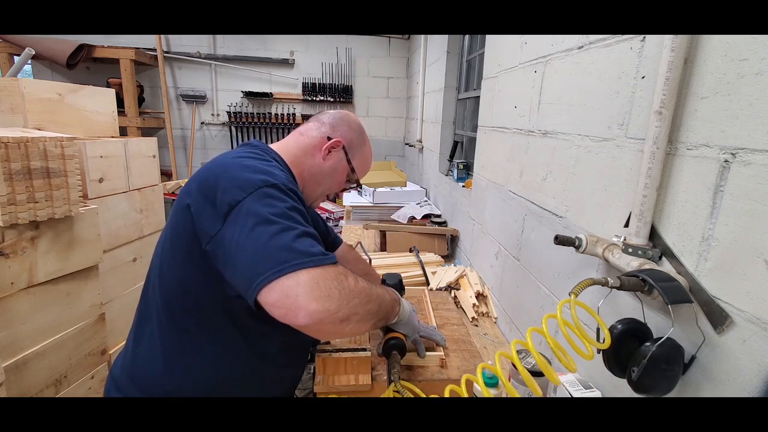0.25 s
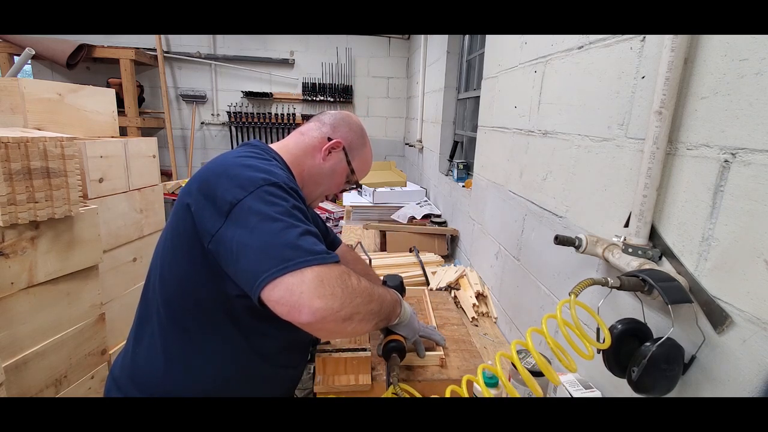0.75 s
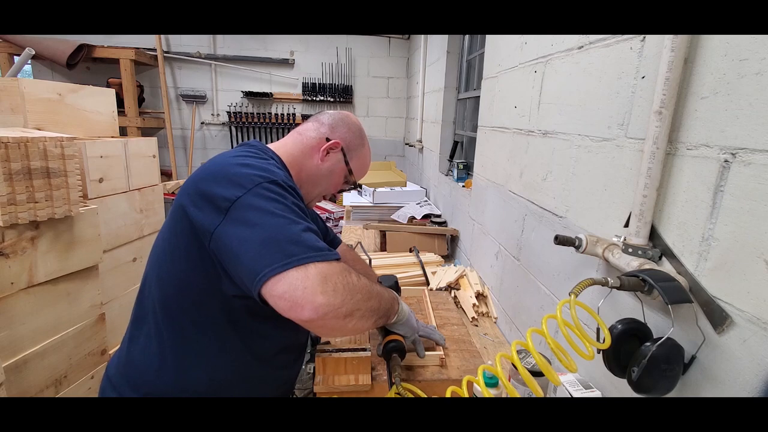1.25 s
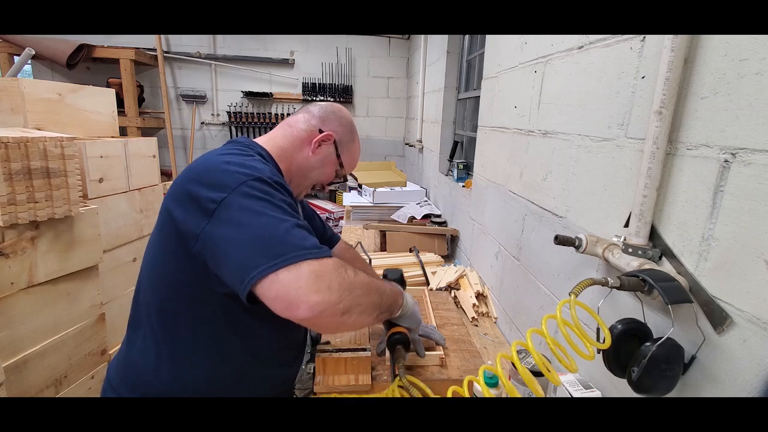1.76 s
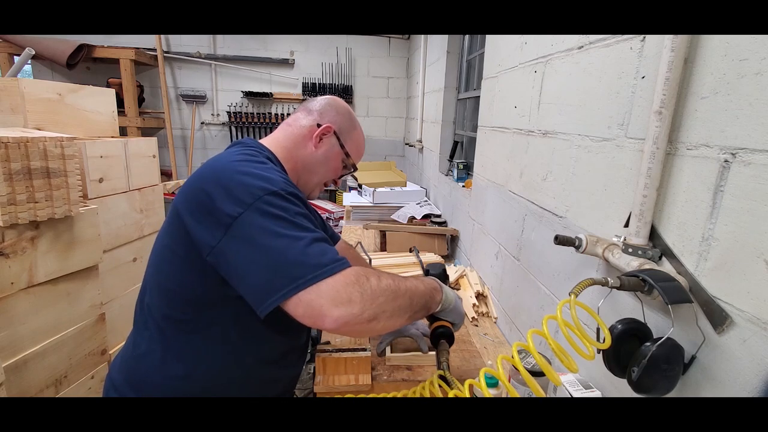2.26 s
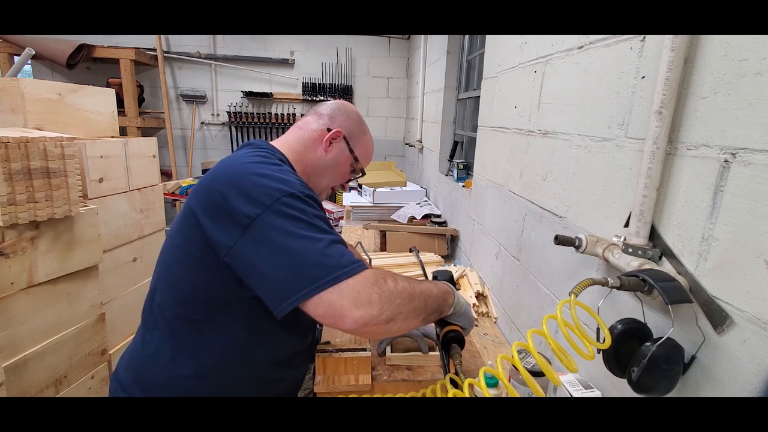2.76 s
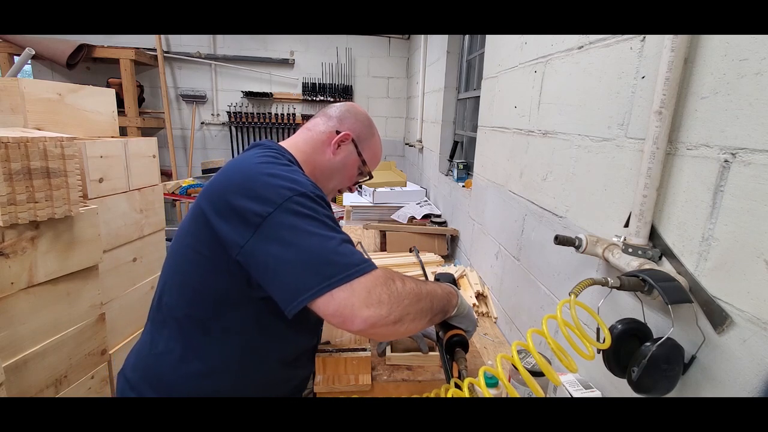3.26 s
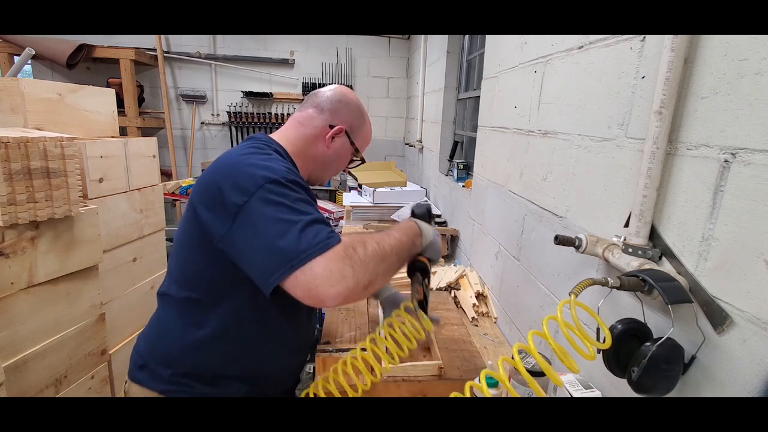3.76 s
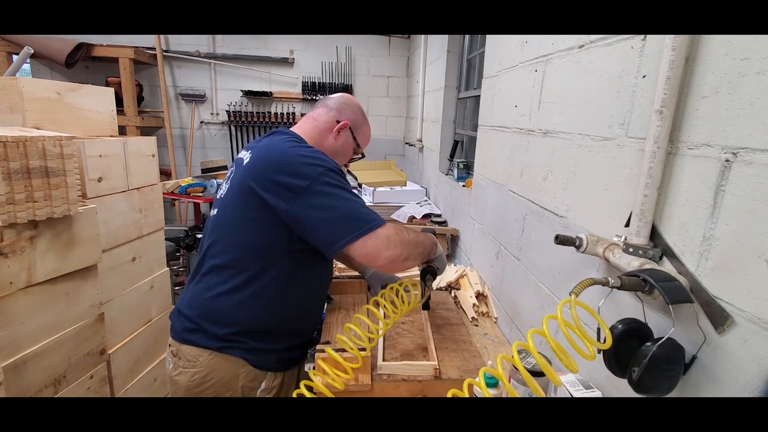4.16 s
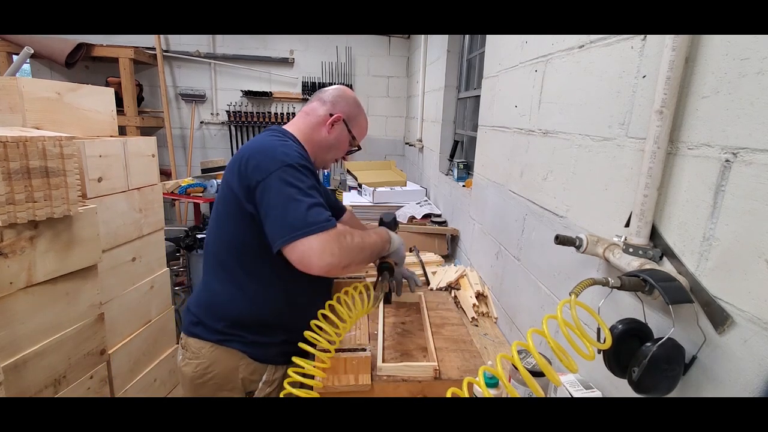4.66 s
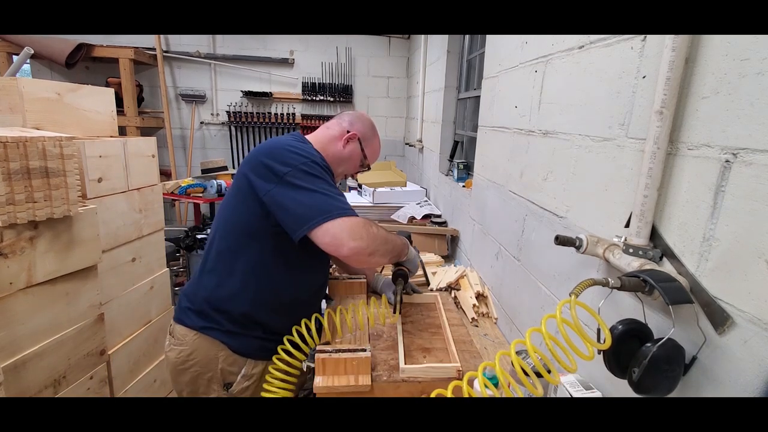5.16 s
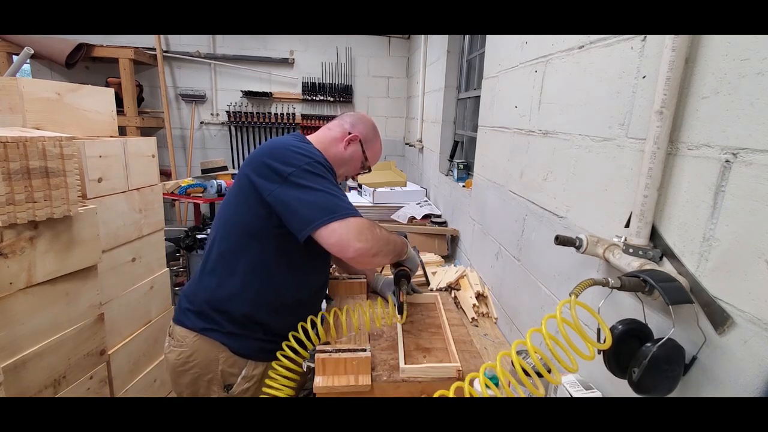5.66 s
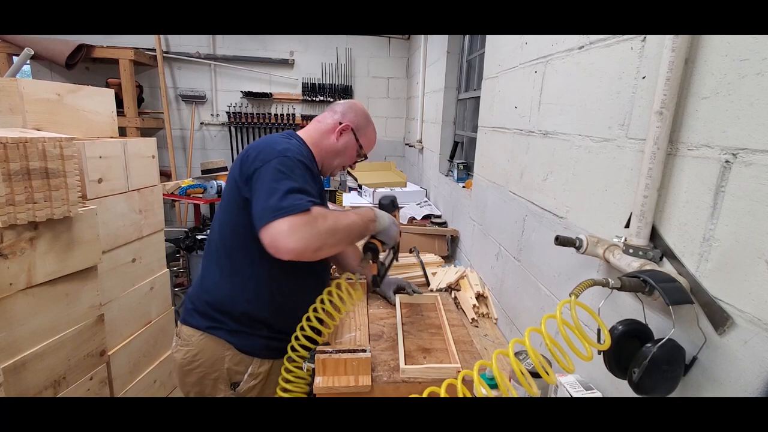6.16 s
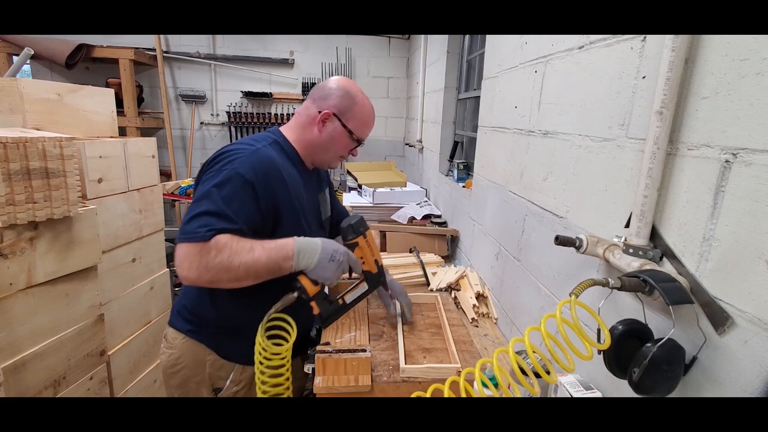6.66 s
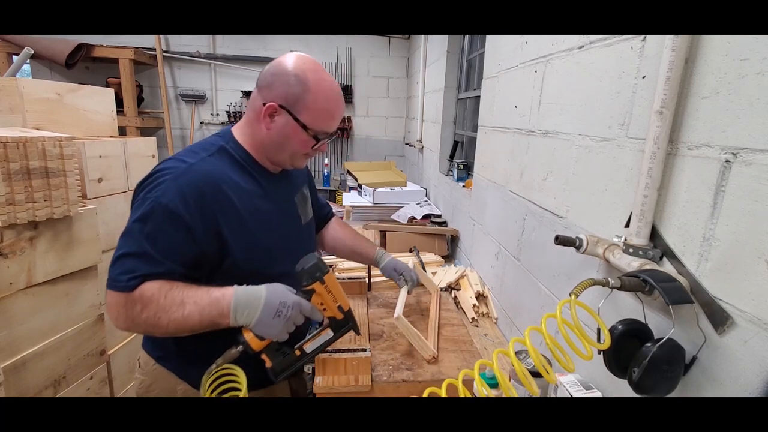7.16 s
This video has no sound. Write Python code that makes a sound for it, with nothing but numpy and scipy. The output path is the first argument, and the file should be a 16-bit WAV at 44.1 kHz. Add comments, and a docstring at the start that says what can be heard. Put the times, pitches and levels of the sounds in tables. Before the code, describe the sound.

An air-fed stapler fires four hard, cracking shots into wooden frames, each followed by a venting puff, with wooden knocks and bench rumble between.

```python
"""Hands rumble and rustle at a bench in a block-walled workshop, a hose seeps, and tool and frame knock.
Then an air-fed stapler fires four staples into wooden frames: each shot is a valve pop and the driver's blow.
Letting go of the trigger pops the valve again, vents the cylinder and springs the piston back.
Between shots come more knocks; about the third shot a frame drags and a grip squeaks, later the nose clinks.
Sines make the pops, squeaks and struck modes, coloured noise the rest; a limiter flattens the loud moments."""
import sys
import numpy as np
from scipy import signal
from scipy.fft import rfft, irfft, next_fast_len
from scipy.io import wavfile
from scipy.ndimage import uniform_filter1d, map_coordinates

SR = 44100
rng = np.random.default_rng(int(sys.argv[2]) if len(sys.argv) > 2 else 0)


def amplitude_ratio(level_db):
    """Convert a level in decibels to the matching linear amplitude (field) ratio."""
    exponent = np.asarray(level_db, float) / 20
    return 10 ** exponent


def generate_wav(sig):
    """Save sig (samples, or channels by samples) to the path in sys.argv[1] as 16-bit PCM at SR."""
    pcm = np.round(np.clip(np.atleast_2d(sig).T, -1, 1) * 32767).astype(np.int16)
    wavfile.write(sys.argv[1], SR, pcm)


N = 327486  # length in samples

# Levels in the tables are relative: each layer trims them further in the mix.
# block walls: (frequency [Hz], decay time t60 before the extra late loss [s], level [dB])
WALLS = [(60, 0.97, -4), (250, 0.51, -5.5), (990, 0.4, -3.5), (4100, 0.64, -0.5), (12300, 0.37, -5)]
# colour difference of the two ports: (frequency [Hz], left over right [dB])
PORT_BALANCE = [(60, -2.5), (500, -6), (4000, -5.5), (8000, -4.5), (13000, -4)]
# air seeping from the bent hose joint: (start [s], end [s], level [dB])
HOSE_LEAKS = [(-.1, 1.6, -65), (4.9, 5.85, -64.5), (7.03, 7.5, -63.5)]
# colour of the seeping air: (frequency [Hz], density [dB])
SEEP_COLOUR = [(760, -32.5), (1300, -1.5), (3280, -10.5), (6450, -11.5), (9580, -16.5), (11300, -1),
               (15600, -8)]
# hands shifting things on the bench top: (start [s], end [s], rumble level [dB])
HAND_SPELLS = [(0, .12, -37), (.33, .87, -50), (1.0, 1.2, -53), (1.36, 1.6, -42.5), (2.6, 2.9, -62),
               (3.02, 3.3, -43.5), (3.55, 4.3, -33.5), (4.87, 5.3, -39.5), (5.4, 6.1, -34.5),
               (6.73, 6.82, -57), (6.9, 7.5, -37.5)]
# colour of the shaken bench: (frequency [Hz], density [dB])
RUMBLE_COLOUR = [(15, -52.5), (25, -15.5), (97, -3.5), (134, -17.5), (186, -9.5), (470, -32.5), (1400, -46),
                 (1950, -73.5), (3300, -120)]
# strokes of cloth on wood: (start [s], strongest [s], end [s], level [dB])
CLOTH_STROKES = [(0, 0.01, 0.12, -61), (2.906, 3.003, 3.25, -73), (4.4, 4.482, 5.1, -60),
                 (6.7, 6.785, 6.92, -57), (6.9, 7.07, 7.8, -55)]
# colour of cloth on wood: (frequency [Hz], density [dB])
CLOTH_COLOUR = [(800, -33), (1400, -9.5), (2300, -15.5), (3000, -6), (3400, -1.5), (3900, -9.5),
                (7000, -11), (15500, -18.5)]
# the frame dragged over the bench: (start [s], end [s], level [dB])
FRAME_DRAGS = [(4.43, 4.72, -50)]
# a rubber grip squeaking: (start [s], end [s], level [dB])
GRIP_SQUEAKS = [(4.54, 4.6, -66), (4.612, 4.63, -55)]
# tool and frame touching the bench:
# (time [s], tick level [dB], wood level [dB], bench level [dB], favoured bench pitch [Hz])
CONTACTS = [(0.0237, -43.5, -34.5, -34, 203), (0.146, -4.5, -10, -8.5, 185), (0.431, -43.5, -31, -24, 237),
            (0.452, -56.5, -34.5, -26.5, 194), (0.6704, -43.5, -43, -23, 185),
            (0.699, -28.5, -22, -18.5, 90), (1.3199, -50.5, -46, -34.5, 91),
            (1.3816, -49.5, -41.5, -29, 93), (2.5428, -41.5, -42.5, -59, 247.5),
            (2.7683, -74, -40.5, -48.5, 183), (2.9585, -51, -34, -32.5, 85.4),
            (3.0704, -52, -37.5, -26.5, 81), (3.7423, -36, -14, -21, 244), (3.8, -60, -29.5, -22, 290),
            (3.82, -54.5, -35.5, -23, 170), (3.853, -49, -25, -21.5, 94), (3.9542, -45.5, -35, -33, 97),
            (3.998, -33.5, -23.5, -34, 96), (4.4506, -32, -28, -54, 102),
            (4.7182, -23.5, -23.5, -24, 109.5), (4.7675, -15.5, -34, -22, 188),
            (4.79, -28, -34, -27.5, 119), (5.058, -48, -26, -43.5, 189), (5.1072, -15.5, -21, -23.5, 350),
            (5.1579, -21, -27.5, -29, 108), (5.2166, -11, -21.5, -16.5, 171),
            (5.356, -33.5, -33.5, -20, 120), (5.415, -37.5, -37, -32.5, 170), (5.522, -72, -37, -14, 98),
            (5.5775, -37.5, -26, -19, 74.3), (5.636, -52, -12.5, -27.5, 352), (5.688, -47.5, -18, -31, 358),
            (6.197, -27.5, -39, -56, 70.4), (6.2757, -31.5, -47, -45, 111.7),
            (6.3131, -36.5, -51, -51, 171), (6.3808, -30.5, -46.5, -59, 135), (6.871, -72, -68, -31, 95),
            (7.3084, -30.5, -9, -4.5, 181.5)]
# the tool's steel nose set ringing: (time [s], level [dB])
NOSE_CLINKS = [(5.218, -10.5), (5.228, -10.5), (5.239, -18)]
# staples shifting in the magazine: (time [s], level [dB], time to fall 20 dB [s])
STAPLE_RATTLES = [(0.097, -47, 0.016), (0.124, -41.5, 0.025), (0.43, -54.5, 0.018), (0.702, -47.5, .05),
                  (1.172, -59.5, .07), (1.336, -57, 0.039), (2.766, -65, 0.033), (2.957, -65.5, 0.042),
                  (3.196, -55, 0.025), (3.216, -49.5, 0.054), (4.617, -52, 0.013), (5.792, -56, 0.013)]
# colour of the rattling staples: (frequency [Hz], density [dB])
RATTLE_COLOUR = [(900, -30), (1800, -10), (2800, -4), (4000, -8), (6000, -9), (15000, -14.5)]
# struck modes, centres of the pitch scatter: (frequency [Hz], level [dB], decay time t60 [s])
BENCH_MODES = [(64.8, -2.5, 0.99), (97, 5, 0.14), (121, 0, 0.14), (171, -5.5, .12), (197.2, 1, 0.14),
               (242, -4, 0.08), (283, -4, 0.15), (359, -4, 0.24)]
WOOD_MODES = [(445.3, 7, 0.27), (526.5, 4, 0.3), (779, -1, 0.4), (940, -4, 0.12), (1102, 6.5, 0.027),
              (1233, -5, 0.051), (1693, -6.5, 0.075), (2220, -10, 0.04), (3050, -13.5, 0.036)]
STEEL_MODES = [(906, -9, .3), (1150, -1, .12), (1550, -7, .1), (1870, 0, .2), (2250, -5, .14),
               (2560, -2, .16), (3200, -7, .1), (4600, -15, .2)]
# bench and all on it jolted at once: (frequency [Hz], density [dB])
THUD_COLOUR = [(24, -43), (40, -9.5), (92, -1.5), (200, -0.5), (383, -4.5), (439, -4.5), (496, -8.5),
               (560, -10.5), (1010, -17), (1410, -12.5), (1500, -17), (1950, -39.5), (3300, -120)]
# splintery bursts and ticks: (frequency [Hz], density [dB])
CRACK_COLOUR = [(530, -34.5), (900, -11.5), (3150, -10), (3600, -11), (4410, -13.5), (11500, -13.5),
                (15600, -23)]
# air rushing from the vent: (frequency [Hz], density [dB])
VENT_COLOUR = [(290, -44.5), (500, -8), (1330, -17.5), (1700, -8.5), (3000, -3), (3980, -3), (13000, 4),
               (14100, -2), (15600, 3)]
# the trigger: (pulled [s], let go [s])
TRIGGER_TIMES = [(1.5594, 1.6914), (3.2660, 3.3910), (4.0474, 4.1378), (5.8202, 5.9045)]
# each pull: (valve pop level [dB], crack level [dB], wood level [dB], bench level [dB])
SHOT_LEVELS = [(-3.5, 4.5, 0, -0.5), (-1.5, 3, 0.5, 3), (-1.5, 3.5, -10.5, 4), (-4.5, 3, -3, 0.5)]
# each release: (vent level [dB], vent length until the port shuts [s])
VENT_SETTINGS = [(-6.5, 0.029), (-8.5, 0.026), (-3.5, 0.015), (-7.5, 0.041)]

LATE_DB = 110  # above the bass the tail dies ever faster: extra dB, times the square of its age in s
PORT_LAG_S = .00006  # the direct sound reaches the right port first
DRIER_ROOM_DB = -9  # pops, steel nose and a tick's noise burst are heard mostly direct, with less room
LEAK_RISE, LEAK_FALL, SEALED_DB = 25, 70, -88  # dB/s in, dB/s out, the joint at rest in dB
HANDS_RISE, HANDS_FALL, STILL_DB = 200, 65, -72.5  # dB/s in, dB/s out, the bench at rest in dB
SQUEAK_HZ, SQUEAK_EDGE = 2125, 700  # mean pitch of the upper tone, dB/s in and out
SOFT_HZ = 1400  # a knock is too slow a contact to wake the wood much above this
GRAIN_HZ = 1900  # top of the rasp of wood grain in a knock
GRIP_DB = 199  # dB/s by which a holding hand damps the knocked wood
DRIVER_S = .011  # from the valve pop to the driver's blow
RELEASE_POP_DB, PISTON_STOP_DB = 10, -18
PISTON_RETURN_S = .053  # from release to the piston's stop
T = np.arange(SR // 3) / SR  # time since a contact [s]


def along(points, hz, col=1):
    """Reads a column of (Hz, value, ..) points on a log frequency axis."""
    table = np.array(points, float)
    return np.interp(np.log(hz + 1), np.log(table[:, 0] + 1), table[:, col])


def unit(x):
    """Scales to rms 1."""
    return x / np.sqrt(np.mean(x ** 2) + 1e-20)


def filtered(x, gain):
    """Shapes x by a gain that depends on frequency."""
    size = next_fast_len(x.shape[-1] + 8192)
    spectrum = rfft(x, size) * gain(np.fft.rfftfreq(size, 1 / SR))
    return irfft(spectrum, size)[..., :x.shape[-1]]


def noise(colour, size):
    """Coloured noise of rms 1."""
    return unit(filtered(rng.standard_normal(size), lambda hz: amplitude_ratio(along(colour, hz))))


def two_port_noise(colour):
    """Coloured noise that is independent at the two ports."""
    return np.array([noise(colour, N), noise(colour, N)])


def wobble(rate):
    """A smooth random curve, rate knots a second."""
    knots = rng.standard_normal(int(N * rate / SR) + 4)
    return map_coordinates(knots, [np.arange(N) * rate / SR])


def spells(rows, rise, fall, rest_db):
    """Gain that climbs to each spell's level, holds it and sinks back to rest."""
    t = np.arange(N) / SR
    held = []
    for start, end, db in rows:
        away_db = rise * np.maximum(start - t, 0) + fall * np.maximum(t - end, 0)
        held.append(amplitude_ratio(db - away_db))
    return np.maximum(np.max(held, axis=0), amplitude_ratio(rest_db))


def add(track, s, sound):
    """Mixes a sound in at s seconds."""
    part = track[round(s * SR):][:len(sound)]
    part += sound[:len(part)]


def decay(t60):
    """Gain that falls 60 dB in t60 seconds."""
    return amplitude_ratio(-60 * T / t60)


def onset(rise):
    """Gain that swells exponentially from 0 towards 1, with a time constant in seconds."""
    return 1 - np.exp(-T / rise)


def workshop(x):
    """Block walls answer with a dense noisy tail, redrawn every fifth of a second and crossfaded."""
    step = SR // 5
    padded = np.pad(x, (step, 2 * step))
    blocks = np.array([padded[k:k + 2 * step] for k in range(0, N + step, step)]) * np.hanning(2 * step)
    hz, t, z = signal.stft(rng.standard_normal((len(blocks), 2, 3 * step)), SR, nperseg=256)
    t60 = along(WALLS, hz)[:, None]
    fade = amplitude_ratio(along(WALLS, hz, col=2)[:, None] - 60 * t / t60) / np.sqrt(t60)
    above_bass = hz ** 2 / (hz ** 2 + 500 ** 2)
    fade = fade * amplitude_ratio(-LATE_DB * np.outer(above_bass, t ** 2))
    tails = signal.istft(z * fade, SR, nperseg=256)[1] / np.sqrt(SR * .055)
    age = np.arange(tails.shape[-1]) / SR
    tails = tails * (1 + 2.5 * np.exp(-age / 0.0015))  # bench top and near wall answer at once and strongly
    # long waves reach both ports alike
    lows = filtered(tails[:, :1] - tails, lambda f: 1 / (1 + (f / 350) ** 2))
    answers = signal.fftconvolve(blocks[:, None], tails + 0.62 * lows, axes=2)
    out = np.zeros((N + step, 2))
    for k, answer in enumerate(answers):
        add(out, k * step / SR, answer.T)
    return out[step:].T


def hose_seep():
    """Air seeps from the bent hose joint as a hiss, faint even at rest."""
    return spells(HOSE_LEAKS, LEAK_RISE, LEAK_FALL, SEALED_DB) * two_port_noise(SEEP_COLOUR)


def bench_rumble():
    """Sliding hands shake the bench in lumps: low noise with a wobbling level."""
    gain = spells(HAND_SPELLS, HANDS_RISE, HANDS_FALL, STILL_DB)
    return gain * amplitude_ratio(3 * wobble(14)) * noise(RUMBLE_COLOUR, N)


def cloth_rustle():
    """Cloth strokes wood: noise swelling and fading with each stroke, with a fast flutter."""
    t = np.arange(N) / SR
    stroke = sum(amplitude_ratio(db) * np.interp(t, [start, top, end], [0, 1, 0]) for start, top, end, db in CLOTH_STROKES)
    return (stroke + amplitude_ratio(-88)) * amplitude_ratio(3.5 * wobble(79)) * two_port_noise(CLOTH_COLOUR)


def frame_drag():
    """The frame drags over the bench and sets it roaring unevenly."""
    gain = spells(FRAME_DRAGS, HANDS_RISE, HANDS_FALL, -200)
    return gain * amplitude_ratio(1.5 * wobble(40)) * noise(THUD_COLOUR, N)


def grip_squeak():
    """A rubber grip squeaks: an unsteady tone with another an octave below."""
    turns = np.cumsum(SQUEAK_HZ * (1 + 0.047 * wobble(390))) / SR
    rub = spells(GRIP_SQUEAKS, SQUEAK_EDGE, SQUEAK_EDGE, -200) * amplitude_ratio(4 * wobble(60))
    return rub * (np.sin(2 * np.pi * turns) + .8 * np.sin(np.pi * turns))


def ring(modes, rise, scatter_db, favour_hz=None):
    """Struck modes of peak 1, new in strength, sign and pitch each blow; the spot struck favours one pitch."""
    hz, db, t60 = np.transpose(modes)[:, :, None]
    if favour_hz:
        db = db - 20 * np.abs(np.log2(hz / favour_hz))
    sign_luck, pitch_luck, level_luck = rng.standard_normal((3, len(modes), 1))
    waves = np.sign(sign_luck) * np.sin(2 * np.pi * hz * (1 + 0.026 * pitch_luck) * T)
    levels = amplitude_ratio(db + scatter_db * level_luck) * decay(t60)
    x = (levels * waves).sum(0) * onset(rise)
    return x / np.abs(x).max()


def clack(modes, rise, rough):
    """Loose parts chatter as they ring, which smears their modes into noise."""
    chatter = map_coordinates(rng.standard_normal(250), [T * 600])  # 600 knots a second
    return ring(modes, rise, scatter_db=2.0) * (1 - rough + rough * chatter)


def thud(rise, t60):
    """A hard jolt wakes so many low modes together that they blend into a dying roar."""
    return noise(THUD_COLOUR, len(T)) * onset(rise) * decay(t60)


def crack(t60):
    """A burst of splintery noise dying fast."""
    return noise(CRACK_COLOUR, len(T)) * decay(t60)


def tick():
    """One hard click of peak 1: a single impulse given the splintery colour."""
    impulse = 1. * (np.arange(len(T)) == 30)  # leaves room for the click's leading side
    click = filtered(impulse, lambda hz: amplitude_ratio(along(CRACK_COLOUR, hz)))
    return click / click.max()


def lowpass(x, hz):
    """Takes off the treble at 12 dB an octave."""
    return signal.lfilter(*signal.butter(2, hz, fs=SR), x)


def knocks():
    """Each contact ticks, clacks the hand-damped frame and thumps the bench top."""
    out, drier = np.zeros((2, N))
    click = tick()
    for s, tick_db, wood_db, bench_db, bench_hz in CONTACTS:
        thump = amplitude_ratio(bench_db) * ring(BENCH_MODES, rise=0.005, scatter_db=1.0, favour_hz=bench_hz)
        wood = lowpass(amplitude_ratio(-GRIP_DB * T) * clack(WOOD_MODES, rise=0.0029, rough=0.55), SOFT_HZ)
        wood = wood + amplitude_ratio(-25) * lowpass(crack(t60=.04), GRAIN_HZ)
        add(out, s, amplitude_ratio(tick_db) * click + amplitude_ratio(wood_db) * wood + thump)
        add(drier, s, amplitude_ratio(tick_db - 10.5) * crack(t60=0.058) * onset(0.00067))
    return np.array([out, drier])


def nose_clinks():
    """The tool's steel nose rings in rough, scattered modes."""
    out, drier = np.zeros((2, N))
    for s, db in NOSE_CLINKS:
        add(drier, s, amplitude_ratio(db) * clack(STEEL_MODES, rise=.0003, rough=.62))
    return np.array([out, drier])


def staple_rattles():
    """Staples shift in the magazine: short noise bursts that start quickly and die away."""
    out, drier = np.zeros((2, N))
    for s, db, length in STAPLE_RATTLES:
        gain = amplitude_ratio(db - 20 * T / length) * np.minimum(T / 0.0015, 1)
        add(out, s, gain * noise(RATTLE_COLOUR, len(T)))
    return np.array([out, drier])


def pop(start_hz, end_hz, rise, t60):
    """A valve slams: the air chamber rings briefly, its pitch sliding as the chamber changes size."""
    hz = start_hz + (end_hz - start_hz) * np.minimum(T / 0.0034, 1)
    return np.sin(2 * np.pi * np.cumsum(hz) / SR) * onset(rise) * decay(t60)


def releases():
    """Letting go pops the valve, the cylinder vents and the piston springs back to its stop."""
    out, drier = np.zeros((2, N))
    for (_, s), (vent_db, length) in zip(TRIGGER_TIMES, VENT_SETTINGS):
        valve = pop(1250 * rng.uniform(.9, 1.15), 2900, rise=0.00038, t60=0.012) + .2 * crack(t60=.012)
        add(drier, s, amplitude_ratio(RELEASE_POP_DB) * valve)
        # pressure sags, then the port shuts
        flow = np.minimum(T / 0.00067, 1) * amplitude_ratio(-60 * T - 600 * np.maximum(T - length, 0))
        add(out, s + .005, amplitude_ratio(vent_db) * flow * noise(VENT_COLOUR, len(T)))
        add(out, s + PISTON_RETURN_S, amplitude_ratio(PISTON_STOP_DB) * pop(950, 1050, rise=0.00076, t60=0.025))
    return np.array([out, drier])


def shots():
    """Air rushes in with a valve pop and recoil, then the driver slams the staple home."""
    out, drier = np.zeros((2, N))
    for (s, _), (pop_db, crack_db, wood_db, bench_db) in zip(TRIGGER_TIMES, SHOT_LEVELS):
        add(out, s - .003, amplitude_ratio(pop_db - 35.5) * crack(t60=0.023))  # the trigger valve opens first
        add(drier, s, amplitude_ratio(pop_db + 3.0) * pop(1500, 1100, rise=0.000073, t60=0.0099))
        add(out, s, amplitude_ratio(pop_db - 5) * crack(t60=0.072))
        add(out, s, amplitude_ratio(bench_db - 9) * thud(rise=.001, t60=.05))  # recoil
        entry = amplitude_ratio(wood_db - 0.5) * pop(1300, 1200, rise=0.0001, t60=0.0028)
        add(out, s + DRIVER_S - .002, entry)  # staple enters the wood
        splinters = amplitude_ratio(crack_db) * crack(t60=0.068) * onset(0.0027)
        wood = amplitude_ratio(wood_db) * clack(WOOD_MODES, rise=0.00025, rough=0.9)
        jolt = amplitude_ratio(bench_db) * thud(rise=0.0015, t60=0.18)
        add(out, s + DRIVER_S, splinters + wood + jolt)
    return np.array([out, drier])


def direct_path(x):
    """The worker's body shades the direct treble, and the right port hears it first."""
    def gain(hz):
        lag = np.exp(1j * np.pi * PORT_LAG_S * np.outer([-1, 1], hz))
        return lag / (1 + 1j * hz / 2500) ** 0.35
    return filtered(x, gain)


def scene():
    """Hands and hose close by; the tool and bench heard directly and off the walls."""
    close = hose_seep() + bench_rumble() + cloth_rustle() + frame_drag() + grip_squeak()
    roomy, drier = knocks() + nose_clinks() + staple_rattles() + releases() + shots()
    walls = amplitude_ratio(1.5) * workshop(roomy + amplitude_ratio(DRIER_ROOM_DB) * drier)
    return close + walls + direct_path(roomy + drier)


def low_pass(x):
    """Removes everything above the highest recorded frequency."""
    return signal.sosfilt(signal.butter(12, 15780, fs=SR, output="sos"), x)


def record(dry):
    """Two ports of unequal colour with a bass cut, a fast limiter, then overload."""
    def port_gain(hz):
        balance = amplitude_ratio(np.outer([.5, -.5], along(PORT_BALANCE, hz)))
        return balance * hz ** 2 / (hz ** 2 + 45 ** 2)
    x = filtered(dry, port_gain)
    fall = 130 * np.arange(N) / SR  # the limiter lets go at 130 dB a second
    peak_db = 20 * np.log10(np.abs(x).max(0) + 1e-9)
    level_db = np.maximum.accumulate(peak_db + fall) - fall
    gain = amplitude_ratio(-.9 * np.maximum(level_db - 6, 0))  # takes back 0.9 of each dB beyond 6 dB over full scale
    x = x * uniform_filter1d(gain, size=45)
    return low_pass(np.clip(x, -1, 1))


dry = scene()
out = record(dry)
generate_wav(out)
```